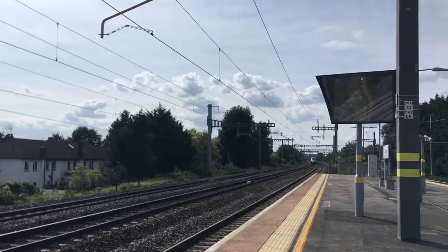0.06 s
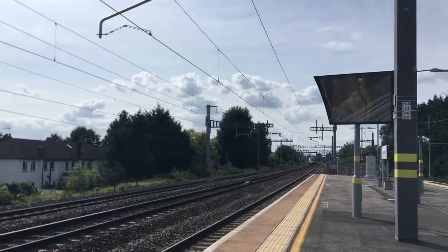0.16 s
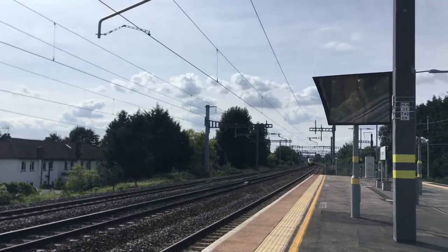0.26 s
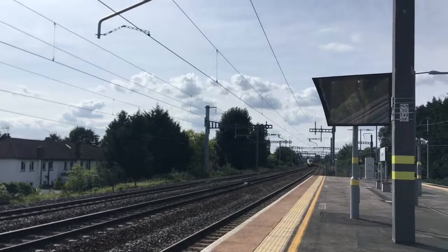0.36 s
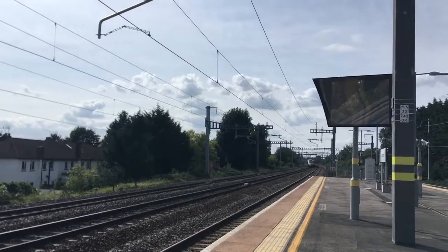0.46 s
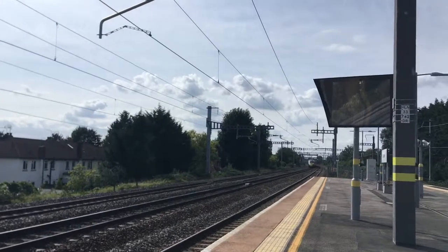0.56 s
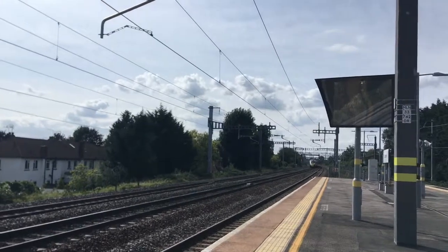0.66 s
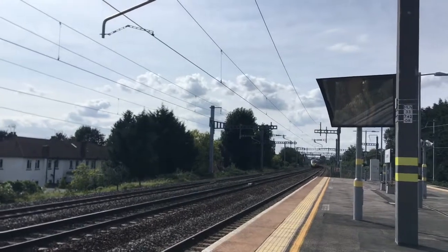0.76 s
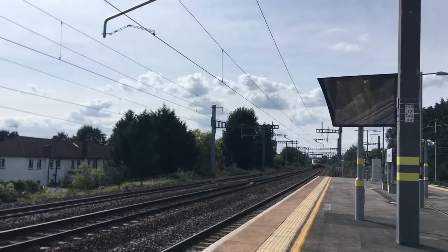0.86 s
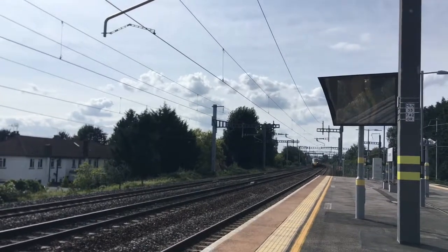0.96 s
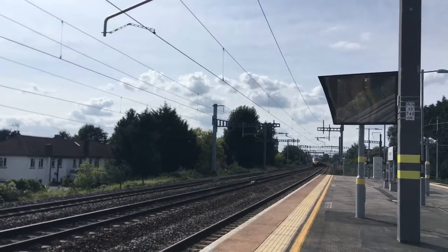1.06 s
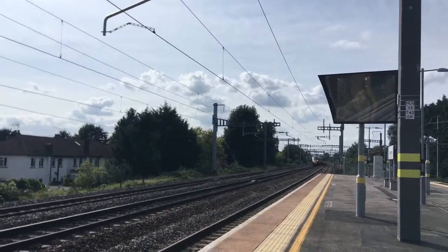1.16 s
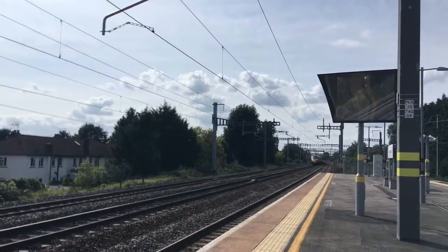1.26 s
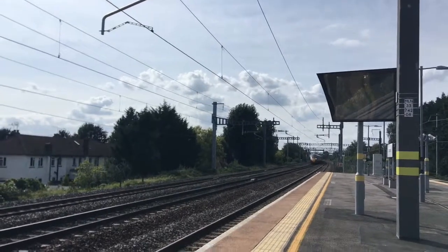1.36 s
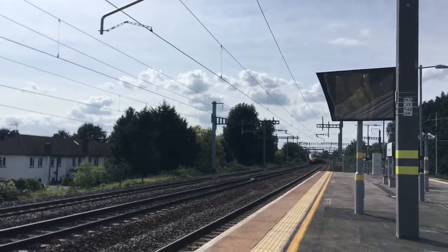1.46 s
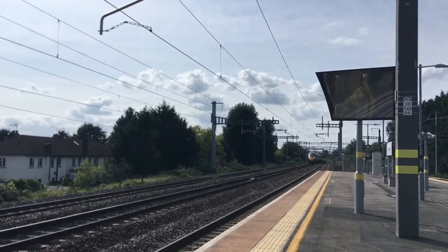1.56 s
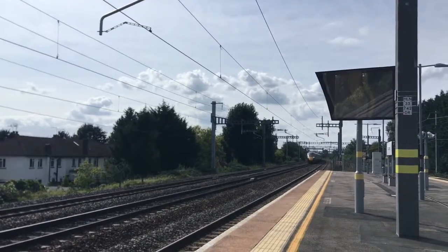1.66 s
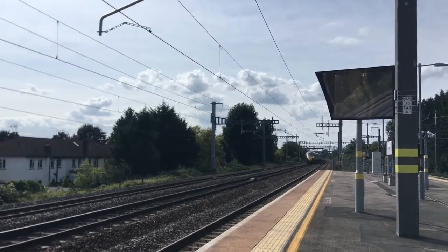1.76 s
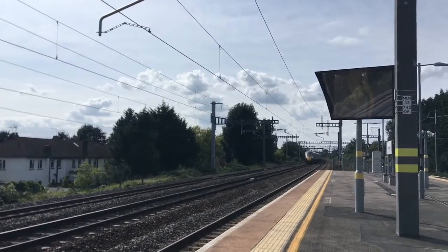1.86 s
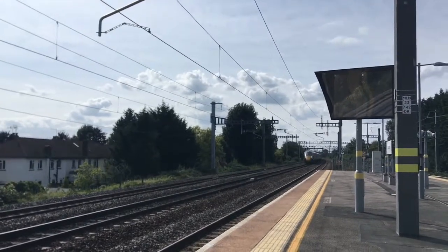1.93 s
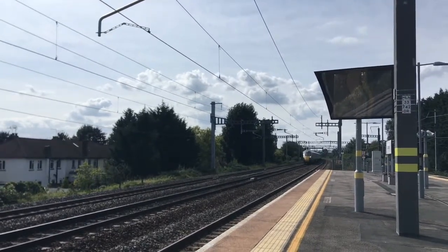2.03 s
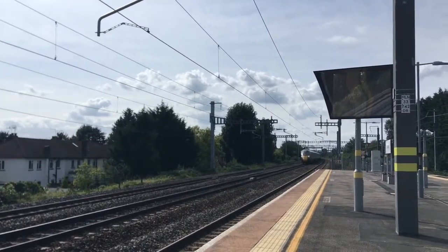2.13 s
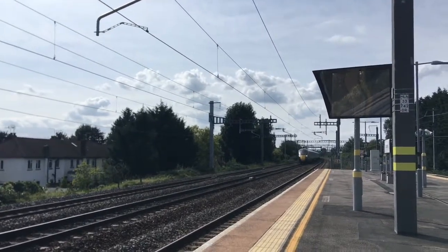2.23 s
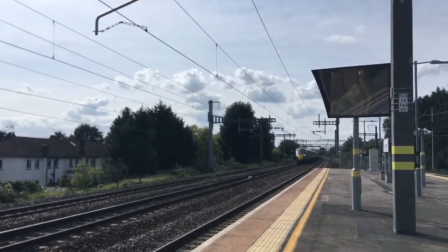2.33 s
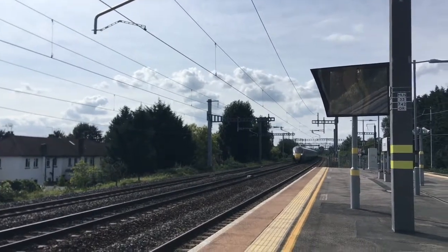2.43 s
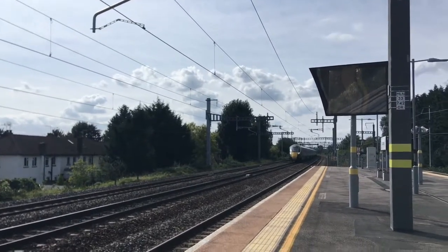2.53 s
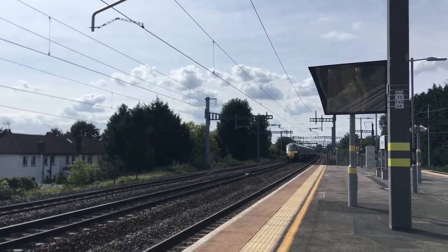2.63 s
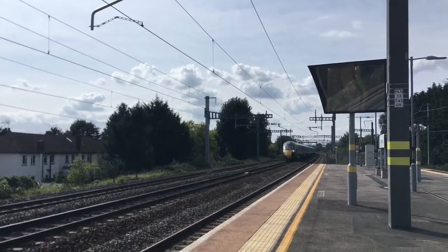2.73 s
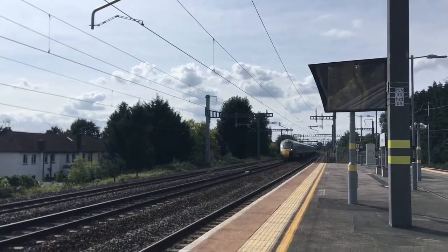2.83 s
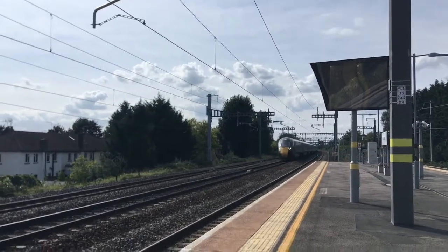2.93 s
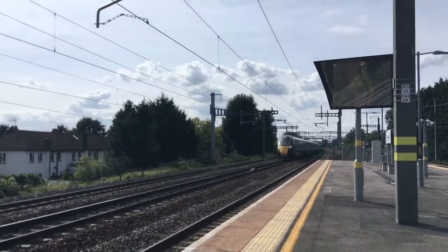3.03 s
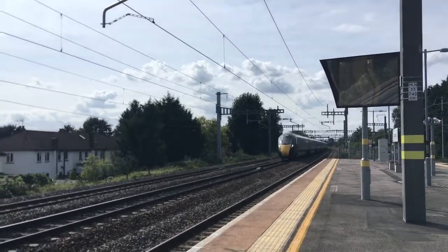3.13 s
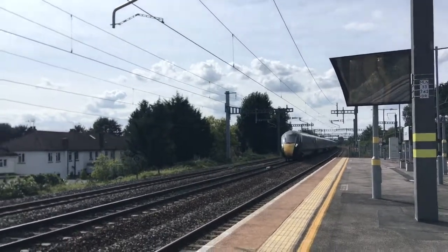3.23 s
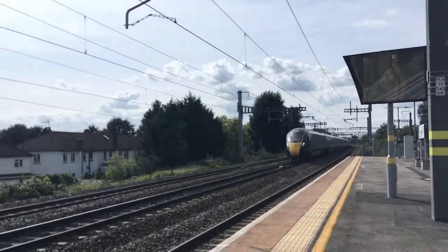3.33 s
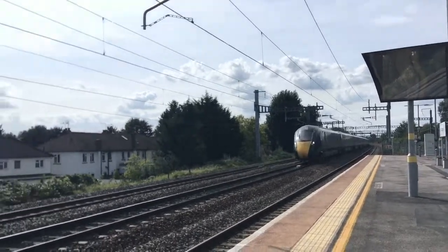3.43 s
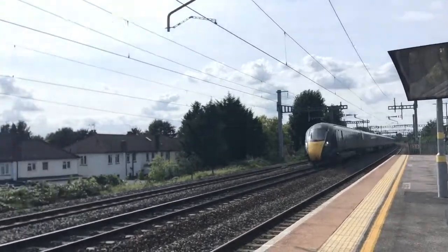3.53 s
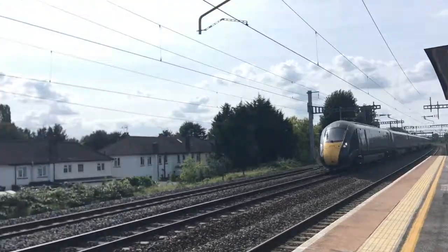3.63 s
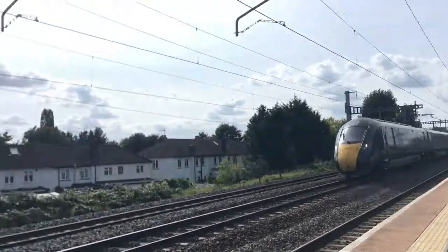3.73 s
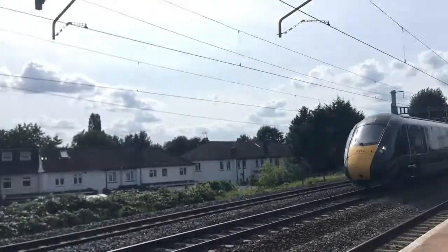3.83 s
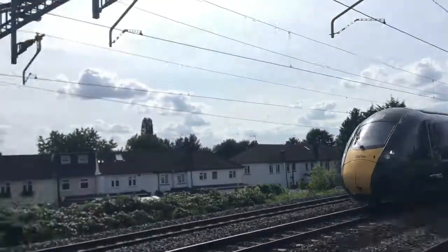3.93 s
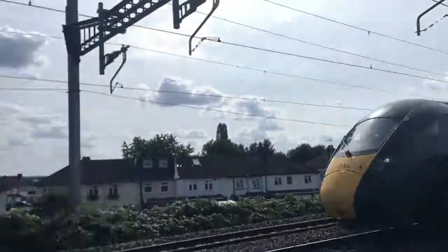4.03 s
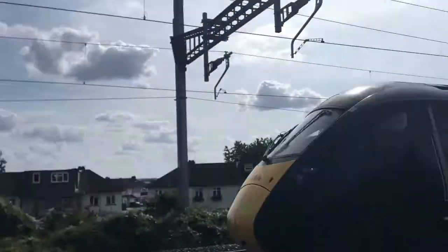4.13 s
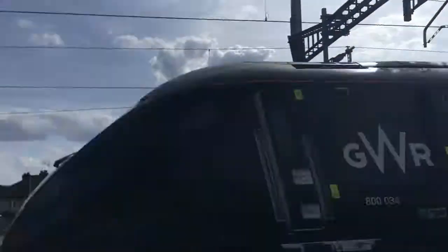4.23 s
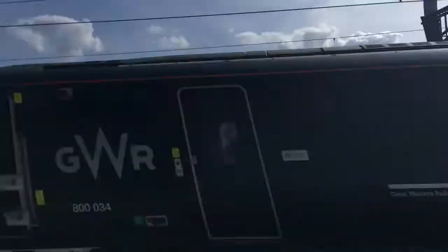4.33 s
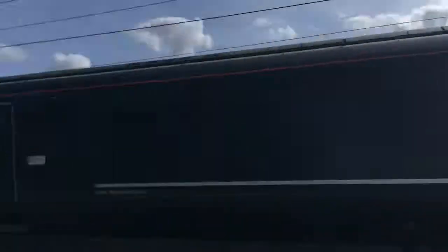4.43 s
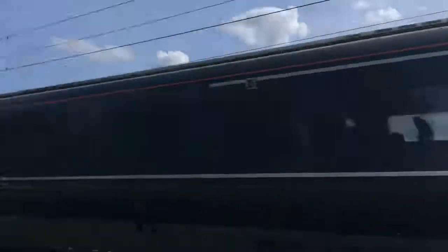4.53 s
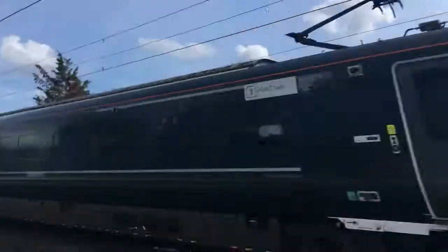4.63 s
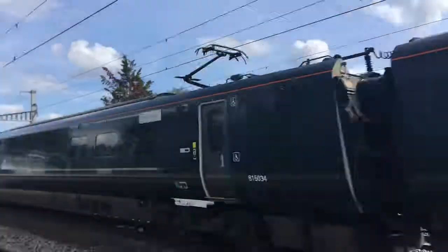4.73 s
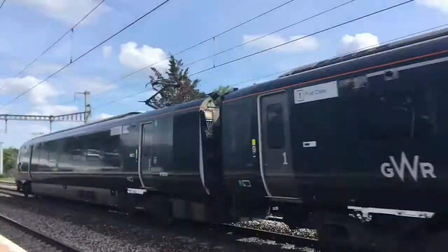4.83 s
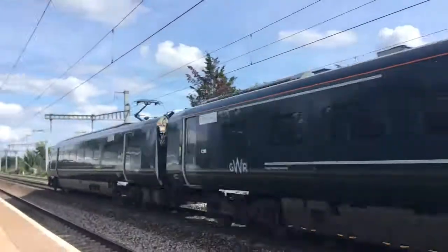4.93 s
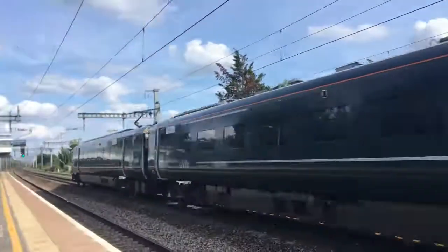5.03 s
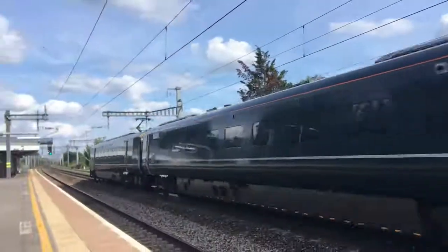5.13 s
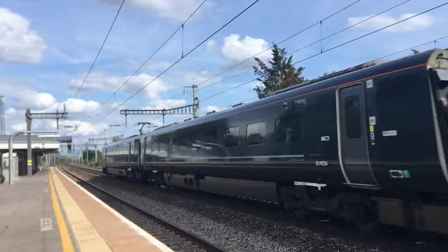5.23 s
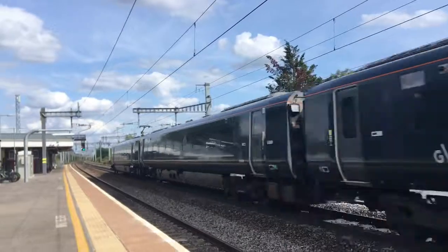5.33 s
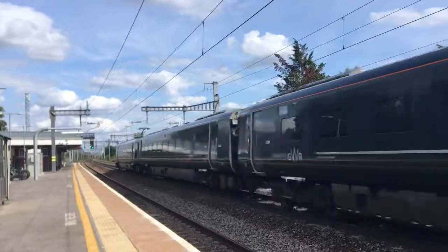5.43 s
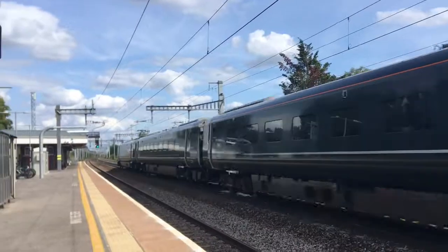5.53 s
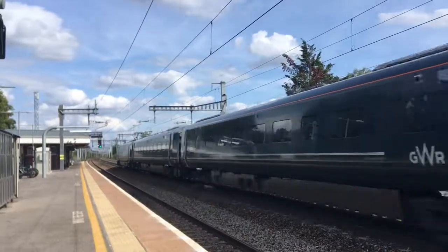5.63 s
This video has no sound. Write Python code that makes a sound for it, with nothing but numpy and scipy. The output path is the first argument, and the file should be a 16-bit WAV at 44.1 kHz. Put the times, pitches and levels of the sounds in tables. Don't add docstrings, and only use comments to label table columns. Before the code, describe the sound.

A fast passenger train approaches an open platform, faint rail singing and whine growing into a bright, rumbling wheel roar sweeping past.

```python
import sys
import numpy as np
from scipy import signal
from scipy.fft import rfft, irfft
from scipy.io import wavfile
from scipy.ndimage import uniform_filter1d

SR = 44100
rng = np.random.default_rng(int(sys.argv[2]) if len(sys.argv) > 2 else 0)


def wav_record(signal):
    frames = np.transpose(np.atleast_2d(signal))
    bounded = np.clip(frames, -1, 1)
    quanta = np.round(bounded * 32767).astype(np.int16)
    wavfile.write(sys.argv[1], SR, quanta)


def natural_amplitude(level_db):
    exponent = np.asarray(level_db, float) / 20
    return 10 ** exponent


N = 250929
FRAME, HOP = 1024, 256

# time [s], level at 1.5-4.5 kHz [dB].
ROAR_LEVEL = [(0, -46.5), (.6, -45), (1.09, -43.5), (1.8, -40), (2.46, -36), (2.85, -34.5), (3.33, -32.5),
              (3.7, -28.5), (4.04, -24.5), (4.14, -21), (4.23, -17.5), (4.33, -18), (4.48, -19),
              (4.69, -17.5), (4.97, -20.5), (5.18, -18.5), (5.5, -21), (5.69, -18.5)]
# time [s], nearness [0 far to 1 alongside].
NEARNESS_CURVE = [(0, 0.0), (2.0, 0.23), (3.3, 0.53), (4.1, 0.97), (5.69, 0.91)]


def in_time(rows, t=None):
    s, *columns = np.transpose(rows)
    if t is None:
        t = np.arange(N) / SR
    return [np.interp(t, s, column) for column in columns]


def at_hz(points, hz):
    points_hz, db = np.transpose(points)
    return np.interp(np.log(hz), np.log(points_hz), db)


def rms_one(x):
    return x / np.sqrt(np.mean(x ** 2) + 1e-20)


def bell(x, centre, spread):
    return np.exp(-.5 * ((x - centre) / spread) ** 2)


def drift(rate_hz):
    step = 40
    r = np.exp(-2 * np.pi * step * rate_hz / SR)
    white = rng.standard_normal(N // step + 2002)
    slow = signal.lfilter([1], [1, -2 * r, r * r], white)[2000:]
    return np.interp(np.arange(N) / step, np.arange(len(slow)), rms_one(slow))


def sine(pitch_hz, stray_rad=0):
    return np.sqrt(2) * np.sin(2 * np.pi * np.cumsum(pitch_hz) / SR + stray_rad)


def resonate(x, hz, width_hz):
    r = np.exp(-np.pi * width_hz / SR)
    poles = [1, -2 * r * np.cos(2 * np.pi * hz / SR), r * r]
    return signal.lfilter([(1 - r * r) / 2, 0, (r * r - 1) / 2], poles, x)


def band(x, low_hz, high_hz):
    return signal.sosfilt(signal.butter(4, [low_hz, high_hz], "band", fs=SR, output="sos"), x)


def frame_grid():
    hz = np.maximum(np.arange(FRAME // 2 + 1) * SR / FRAME, 1)
    return hz, np.arange(N // HOP + 4) * HOP / SR


def moving_noise(colour_db, patchy_db):
    spectra = signal.stft(rng.standard_normal(N + HOP), nperseg=FRAME, noverlap=FRAME - HOP)[2]
    colour_db = colour_db[:, :spectra.shape[1]]
    patch = rng.standard_normal(spectra.shape)
    patch = uniform_filter1d(uniform_filter1d(patch, size=9, axis=0), size=14, axis=1)
    gain = natural_amplitude(colour_db + patchy_db * rms_one(patch)) * np.sqrt(FRAME / 2)
    return signal.istft(spectra * gain, nperseg=FRAME, noverlap=FRAME - HOP)[1][:N]


def wires():
    wire_hiss = (6900, 430, -66.5)
    hz, width_hz, db = wire_hiss
    fizz = rms_one(band(rng.standard_normal(N), hz - width_hz / 2, hz + width_hz / 2))
    return natural_amplitude(db + .8 * drift(8)) * fizz


def side_bursts():
    # centre time [s], low edge [Hz], high edge [Hz], level [dB].
    burst_rows = [(.17, 5100, 6900, -78), (3.073, 5100, 6400, -54), (3.073, 12300, 14000, -50),
                  (3.166, 14300, 15900, -52), (3.19, 4200, 5300, -58), (3.282, 6300, 7700, -56),
                  (3.282, 14300, 15900, -54), (3.352, 4700, 5900, -57), (3.352, 9700, 11200, -55),
                  (4.025, 5600, 7200, -40), (4.025, 11600, 13200, -40), (4.791, 4600, 5900, -41),
                  (4.791, 10300, 11800, -41), (5.093, 8900, 10600, -39), (5.163, 4600, 5900, -43),
                  (5.325, 10800, 12600, -41)]
    length = 2048
    side = np.zeros(N)
    for s, low_hz, high_hz, db in burst_rows:
        burst = rms_one(band(rng.standard_normal(length), low_hz, high_hz))
        burst = burst * np.sin(np.pi * np.arange(length) / length)
        side[round(s * SR) - length // 2:][:length] += natural_amplitude(db + 3.5) * burst
    return side * [[1], [-1]]


def handling():
    # start [s], peak [dB], pitch [Hz, minus for a pull], t60 [s].
    gust_rows = [
        (0.0416, -11, -125, 0.048),
        (.097, -16.5, 94, 0.17),
        (.555, -18, -75, 0.06),
        (0.724, -22, 180, 0.029),
        (0.751, -12, 65, .09),
        (0.947, -18, 216, 0.041),
        (1.012, -17, 75, .07),
        (2.761, -21.5, 143, 0.14),
        (3.706, -3, 60, 0.057),
        (3.841, -15, 194, 0.11),
    ]
    knock = (.0415, -19, -430, .025)
    # start [s], peak [dB], pitch [Hz].
    tick_rows = [
        (.0005, -26, 3300),
        (.672, -32, 3000),
        (.732, -34, 3000),
        (.7305, -36, 10000),
        (.7335, -36, 9000),
        (.84, -32, 2600),
        (1.068, -24, 3000),
        (1.1225, -24, 3600),
        (1.1228, -38, 9500),
    ]
    out = np.zeros(N)
    t = np.arange(int(.12 * SR)) / SR
    for s, db, hz, t60_s in gust_rows + [knock]:
        push = natural_amplitude(db - 60 * t / t60_s) * np.sin(2 * np.pi * hz * t)
        out[round(s * SR):][:len(t)] += push
    for s, db, hz in tick_rows:
        snap = (1 + .4 * rng.standard_normal(200)) * natural_amplitude(db - 3 * np.arange(200))
        out[round(s * SR):][:200] += resonate(snap, hz, width_hz=2800)
    return out


def rumble():
    # time [s], centre [Hz].
    centre_rows = [(0, 50.8), (.45, 50.1), (1.0, 61.7), (1.25, 66.6), (1.55, 57.6), (1.85, 70.9),
                   (2.35, 71), (3.1, 62.35), (3.3, 57.3), (3.85, 68.3), (4.4, 52.73), (4.8, 62.1),
                   (5.2, 46), (5.69, 61.2)]
    # frequency [Hz], density [dB per Hz].
    broad_colour = [(18, -41), (30, -4), (43, -2.5), (59, -1), (113, -12), (140, -62), (180, -38),
                    (310, -120)]
    # centre time [s], spread [s], peak [dB].
    throb_rows = [(.02, 0.045, -19), (.2, 0.095, -32), (.43, 0.077, -27), (.55, 0.025, -27),
                  (.78, 0.04, -26), (.85, 0.027, -28), (1.01, 0.03, -28), (1.22, .04, -33),
                  (1.43, 0.026, -25), (1.701, 0.067, -31), (2.2, 0.13, -36), (2.54, .02, -27),
                  (2.7, .06, -35), (2.95, 0.15, -29), (3.17, 0.055, -23.5), (3.31, .025, -24),
                  (3.47, .03, -22), (3.71, 0.042, -18.5), (3.85, 0.062, -18), (4.0, .06, -18.5),
                  (4.15, 0.036, -12), (4.37, 0.04, -9), (4.47, 0.027, -16), (4.57, 0.061, -14.5),
                  (4.84, 0.052, -14.5), (5.09, 0.057, -17.5), (5.21, 0.016, -24), (5.3, .04, -23),
                  (5.55, 0.046, -17), (5.69, 0.023, -22.5)]
    bed_db, roar_share = -21.0, .5
    (centre_hz,), (roar_db,), t = in_time(centre_rows), in_time(ROAR_LEVEL), np.arange(N) / SR
    hz = np.maximum(np.fft.rfftfreq(N, 1 / SR), 1)
    broad = irfft(rfft(rng.standard_normal(N)) * natural_amplitude(at_hz(broad_colour, hz)) * (hz < 135), N)
    throb = sine(centre_hz * (1 + .03 * drift(6))) * natural_amplitude(1.5 * drift(9))
    both = rms_one(broad) + natural_amplitude(-7.0) * rms_one(throb)
    local_rms = np.sqrt(uniform_filter1d(both ** 2, size=SR // 8))
    bed = natural_amplitude(bed_db + roar_share * (roar_db - roar_db[-1]))
    throb_power = sum((natural_amplitude(db) * bell(t, s, spread_s)) ** 2 for s, spread_s, db in throb_rows)
    return np.sqrt(bed ** 2 + throb_power) * both / local_rms


def machine_tone(rows, fades, wobble, flutter_db, trim_db, rough_rad):
    (pitch_hz, level_db), t = in_time(rows), np.arange(N) / SR
    level_db = level_db - sum(db * bell(t, s, spread_s) for s, spread_s, db in fades)
    sounding = np.clip(np.minimum(t - rows[0][0], rows[-1][0] - t) / 0.23, 0, 1)
    wave = sine(pitch_hz * (1 + wobble * drift(5.4)), rough_rad * drift(25))
    return sounding * natural_amplitude(level_db + trim_db + flutter_db * drift(15)) * wave


def gear_whine():
    # time [s], pitch [Hz], level [dB].
    whine_rows = [(.1, 728, -48), (.5, 721, -43), (1.15, 719.6, -37), (1.5, 722, -38), (2.5, 723.7, -34),
                  (3.2, 724, -34.5), (3.6, 722, -33), (4.1, 724.5, -31)]
    # centre time [s], spread [s], depth [dB].
    whine_fades = [(.38, 0.024, 9), (.57, 0.033, 2), (.9, 0.056, 3.5), (1.34, 0.054, 8), (1.65, 0.073, 12),
                   (2.48, 0.064, 4), (3.04, 0.033, 22), (3.39, 0.059, 2), (3.56, 0.057, 9),
                   (3.83, 0.041, 11), (4.04, 0.023, 18)]
    return machine_tone(whine_rows, whine_fades, wobble=0.002, flutter_db=1.6, trim_db=3, rough_rad=.25)


def fan_drone():
    # time [s], pitch [Hz], level [dB].
    drone_rows = [(1.75, 229.8, -34), (2.7, 228.7, -31), (3.2, 225.5, -21.5), (3.6, 217.3, -24.5),
                  (4.3, 215.2, -14.5), (4.5, 212.3, -14), (4.62, 205.7, -14.5), (4.72, 188.5, -17.5),
                  (4.8, 179, -27), (5.0, 165, -33)]
    # centre time [s], spread [s], depth [dB].
    drone_fades = [
        (2.33, 0.08, 15),
        (2.76, 0.015, 18),
        (2.91, 0.018, 15),
        (3.14, 0.045, 16),
        (3.36, 0.042, 16),
        (3.8, 0.088, 6.1),
        (4.189, 0.055, 20),
        (4.39, 0.022, 11),
        (4.56, 0.014, 7.2),
    ]
    return machine_tone(drone_rows, drone_fades, wobble=0.014, flutter_db=2, trim_db=-5.5, rough_rad=.4)


def rail_song():
    # time [s], level [dB].
    song_level = [(0.0, -53), (1.6, -43.5), (1.95, -42.5), (2.03, -45.5), (2.3, -40), (2.63, -42),
                  (2.72, -38), (3.26, -38), (3.72, -30.5), (3.82, -26.5), (4.02, -28), (4.18, -23),
                  (4.53, -26), (4.64, -26), (5.05, -29.5), (5.09, -27), (5.36, -29.5), (5.69, -27.5)]
    # frequency [Hz], density [dB per Hz].
    song_colour = [(10400, -19), (10900, -21), (11250, -5), (11450, 0.5), (12400, 0.5), (13500, 3),
                   (14300, -5), (15000, -1), (15550, -4), (15800, -10.5)]
    # mode frequency [Hz], width [Hz], level [dB].
    mode_rows = [(10917, 30, -10), (11579, 40, -2), (11789, 15, -7), (12263, 30, -2), (12941, 30, 1),
                 (13044, 15, -6), (13647, 30, -2), (14314, 25, -2), (14567, 25, -6), (15003, 50, -6),
                 (15671, 30, -7)]
    sleeper_step_hz, sleeper_top_hz, modes_db = 683, 12960, -17
    hz, t = frame_grid()
    near, = in_time(NEARNESS_CURVE, t)
    colour = at_hz(song_colour, hz) - 60 * (hz < 10400)
    colour -= 10 * np.log10((natural_amplitude(colour[hz > 11000]) ** 2).sum())
    ramp = (hz - sleeper_top_hz) / sleeper_step_hz % 1 - .5
    hiss = moving_noise(colour[:, None] + np.outer(3.5 * ramp, 1 - .6 * near ** 3), patchy_db=.6)
    white = rng.standard_normal(N)
    modes = 0
    for mode_hz, width_hz, db in mode_rows:
        once = resonate(white, mode_hz, 1.5 * width_hz)
        modes = modes + natural_amplitude(db + 2 * drift(4)) * rms_one(resonate(once, mode_hz, 1.5 * width_hz))
    modes_gain = natural_amplitude(modes_db - 3.8 * in_time(NEARNESS_CURVE)[0] ** 4)
    return natural_amplitude(in_time(song_level)[0]) * (hiss + modes_gain * modes)


def region_levels(t):
    # level over the curve alongside [dB], gain per second of distance [dB/s].
    region_rows = [
        (4.5, 1.36),
        (-0.5, -4),
        (-0.5, 0),
        (-6.5, -3.5),
    ]
    # centre time [s], spread [s], level [dB].
    breeze_rows = [
        (.03, 0.039, -33),
        (1.0, 0.34, -35.5),
        (4.311, 0.037, -16.5),
        (4.58, 0.046, -22),
        (5.54, 0.036, -20.5),
    ]
    arrival_s, town_db = 4.1, -38
    level_db, = in_time(ROAR_LEVEL, t)
    away_s = np.maximum(arrival_s - t, 0)
    body, low, edge, top = [level_db + db + slope_db * away_s for db, slope_db in region_rows]
    power = natural_amplitude(low) ** 2 + natural_amplitude(town_db) ** 2
    power = power + sum((natural_amplitude(db) * bell(t, s, spread_s)) ** 2 for s, spread_s, db in breeze_rows)
    return body, 10 * np.log10(power), edge, top


def head_on():
    # pitch [Hz], width [Hz], level over the roar [dB], loudest at [s], spread [s].
    ring_rows = [(1124, 16.5, -14, 0.97, 0.73), (1115.5, 13, -10, 1.584, 0.17),
                 (1123, 10.6, -12, 2.6, 0.34), (1118, 18, -13, 3.23, .15), (1250, 40.1, -12, 1.24, 1.9),
                 (1323, 51.6, -11.5, 1.1, 0.83), (1333, 40.7, -15, 2.455, .3), (643.5, 23, -7.5, 2.8, 0.32),
                 (447.7, 15.6, -12.5, 0.3, 1.03), (518, 10, -8, 3.76, 0.15), (647, 22, -7.5, 3.55, 0.18),
                 (536, 20, -10.5, 3.4, 0.24), (672, 30, -11.5, 4.15, 0.097), (594, 28, -8.5, 4.67, 0.05),
                 (580, 25, -10, 5.5, 0.088), (1386, 13, -18, 5.07, 0.49), (2557, 15.8, -24.5, 4.85, 0.59),
                 (1415, 11, -15.5, 3.8, 0.59), (2040, 33, -20, 6.2, 3.2), (9100, 50, -29, 6.3, 0.76),
                 (8650, 49.3, -37, 4.7, .9), (9900, 60, -26, 3.3, 1), (5663, 24, -42, 5.8, 1.5)]
    sink_share = .03
    t, (near,), rings = np.arange(N) / SR, in_time(NEARNESS_CURVE), 0
    for hz, width_hz, db, s, spread_s in ring_rows:
        near_then = near[min(round(s * SR), N - 1)]
        pitch_hz = hz * (1 - sink_share * (near - near_then)) + .55 * width_hz * drift(14)
        rings = rings + natural_amplitude(db + 3 * drift(12)) * bell(t, s, spread_s) * sine(pitch_hz)
    body_db = region_levels(frame_grid()[1])[0].repeat(HOP)[:N]
    return natural_amplitude(uniform_filter1d(body_db, size=SR // 2)) * rings


def wheel_roar():
    edges_hz = [400, 1500, 120, 400, 1500, 4500, 4500, 10500]
    # frequency [Hz], density [dB per Hz].
    far_colour = [(59, -33), (100, -3), (223, 1.5), (332, -14), (582, -12), (717, -13.5), (829, -18),
                  (1280, -17.5), (1480, -17.5), (3080, -29), (4600, -41), (5980, -73), (10100, -120)]
    far_treble = [(4900, -44.5), (6400, -41), (7400, -42), (8000, -52), (9300, -41), (10500, -39.5),
                  (11200, -33)]
    near_colour = [(59, -33), (100, 14.5), (174, 8), (208, 8.5), (238, 4), (466, -8.5), (603, -5.5),
                   (764, -11.5), (1050, -8.5), (1470, -10), (2180, -9), (4790, -21), (5840, -17.5),
                   (7550, -22), (11200, -13.5), (14600, -56), (22000, -120)]
    # time
    # [s], spread [s], centre [Hz], width [octaves], level over roar [dB].
    sweep_rows = [(2.903, 0.16, 5030, 1.7, -2.5), (3.65, 0.49, 400, 1.6, 3.5),
                  (2.949, 0.21, 232, 0.085, 12), (3.752, 0.43, 9050, 0.72, 4.5), (3.903, 0.07, 170, 0.6, 6),
                  (4.08, 0.046, 125, .4, -1), (4.28, .05, 140, .5, 3.5), (5.49, 0.054, 575, .2, -5),
                  (3.95, .06, 1050, 0.45, -1.5), (4.15, .05, 540, .3, -1), (5.1, 0.086, 290, 0.44, 3),
                  (3.451, 0.31, 435, 0.19, 2), (3.55, .12, 580, 0.18, 3), (3.7, 0.049, 663, .13, -12),
                  (4.044, 0.056, 1100, 0.54, 5), (4.057, 0.15, 456, 0.3, 7), (4.227, 0.16, 2288, 0.49, 4),
                  (4.25, 0.092, 3200, 0.27, 3), (4.273, 0.067, 1000, 0.21, 5.5),
                  (4.535, 0.028, 785, 0.64, 2), (4.634, 0.063, 5100, 0.64, 3.5),
                  (4.65, 0.23, 1056, 0.35, 0), (4.707, 0.15, 2170, 0.46, 3), (4.843, 0.049, 586, .13, 6),
                  (4.948, 0.026, 5000, 0.74, -3.5), (5.036, 0.063, 724, 0.38, 7.5),
                  (5.196, 0.05, 806, 0.49, 4.5), (5.199, 0.15, 580, 0.16, 4.5), (4.33, 0.022, 635, 0.16, 6),
                  (4.62, 0.022, 940, .4, 4), (5.082, .05, 440, .3, -4), (5.3, 0.037, 400, 0.32, -11),
                  (4.15, .05, 6000, 1.5, 1), (4.2, .06, 12500, .5, -1), (5.467, 0.045, 6400, 0.9, -0.5),
                  (4.9, .03, 7000, 1, 0.5), (5.45, 0.31, 302, 0.36, 2.5), (5.545, 0.05, 980, 0.56, 6),
                  (5.25, 0.52, 140, 0.53, -6.5)]
    fall_octaves_per_s = 0.57
    hz, t = frame_grid()
    near, = in_time(NEARNESS_CURVE, t)
    colour = np.outer(at_hz(far_colour[:-2] + far_treble, hz), 1 - near)
    colour += np.outer(at_hz(near_colour, hz), near)
    lift = {}
    for (low_hz, high_hz), db in zip(np.reshape(edges_hz, (-1, 2)), region_levels(t)):
        power = (natural_amplitude(colour[(hz >= low_hz) & (hz < high_hz)]) ** 2).sum(axis=0)
        lift[np.sqrt(low_hz * high_hz)] = uniform_filter1d(db, size=5) - 10 * np.log10(power)
    centres_hz = sorted(lift)
    hats = [np.interp(np.log(hz), np.log(centres_hz), row) for row in np.eye(len(centres_hz))]
    colour += sum(np.outer(hat, lift[c]) for hat, c in zip(hats, centres_hz))
    for s, spread_s, centre_hz, octaves, db in sweep_rows:
        off_centre = np.log2(hz / centre_hz)[:, None]
        colour += db * bell(t, s, spread_s) * bell(off_centre, fall_octaves_per_s * (s - t), octaves / 2)
    colour -= (60 * (hz < 110) + np.clip((hz - 10800) / 60, 0, 60))[:, None]
    return moving_noise(colour, patchy_db=.9)


def scene():
    mono = wires() + handling() + rumble() + gear_whine() + fan_drone()
    mono = mono + rail_song() + head_on() + wheel_roar()
    return np.array([mono, mono])


def band_limit(x):
    return signal.sosfilt(signal.butter(12, 15700, fs=SR, output="sos"), x)


def record(dry):
    # frequency [Hz], width [Hz], gain [dB].
    reflection_notches = [
        (4830, 210, -3),
        (7620, 540, -4),
        (10400, 1380, -10.5),
    ]
    x = signal.sosfilt(signal.butter(5, 43, "high", fs=SR, output="sos"), dry)
    for hz, width_hz, db in reflection_notches:
        x = x - (1 - natural_amplitude(db)) * resonate(x, hz, width_hz)
    x = np.clip(1.337 * np.tanh(x / 1.486), -1, 1) + side_bursts()
    return band_limit(x)


dry = scene()
out = record(dry)
wav_record(out)
```